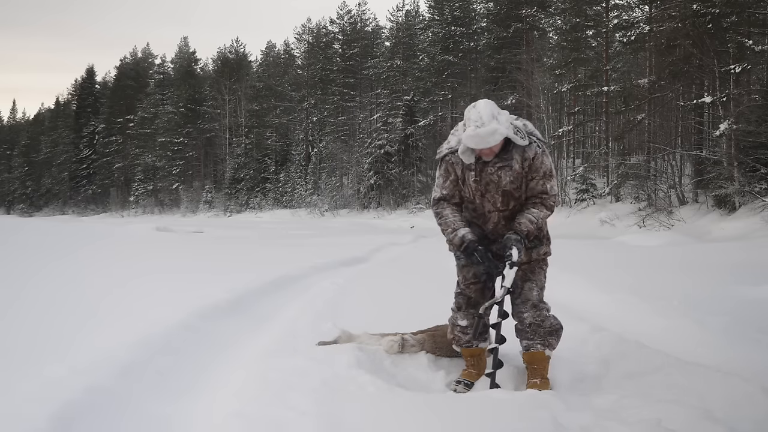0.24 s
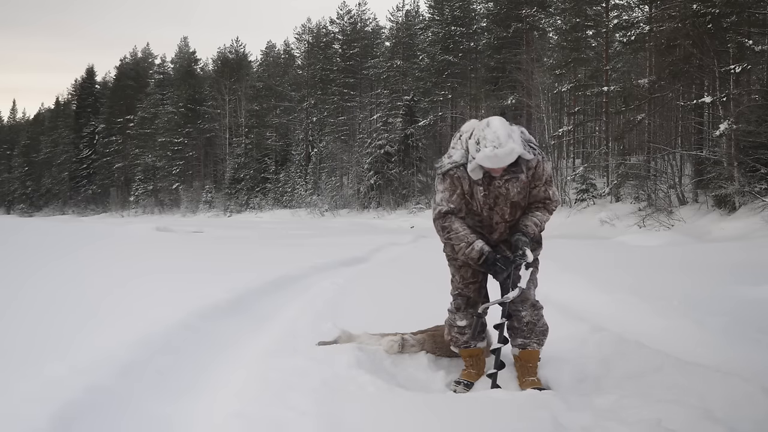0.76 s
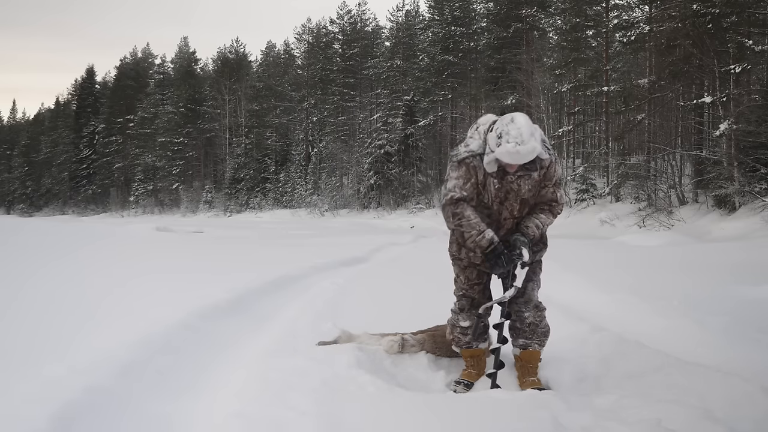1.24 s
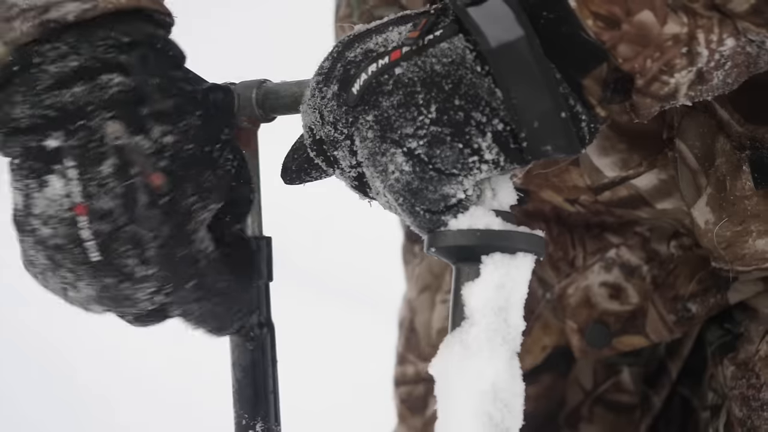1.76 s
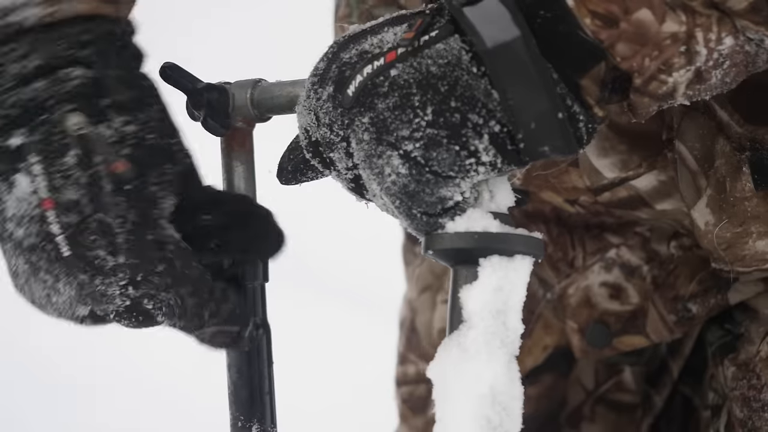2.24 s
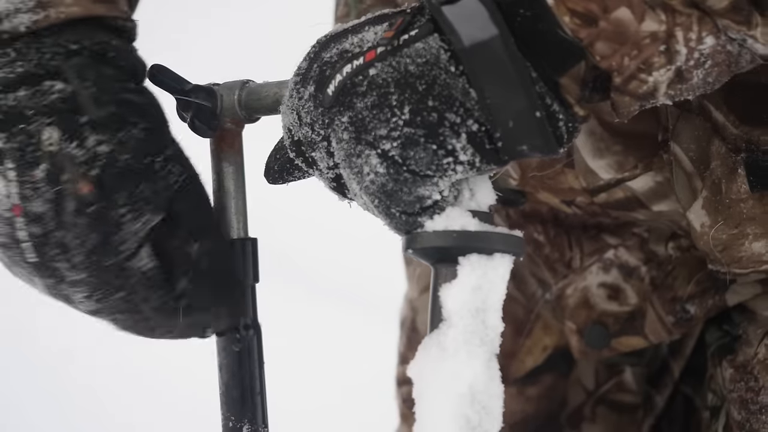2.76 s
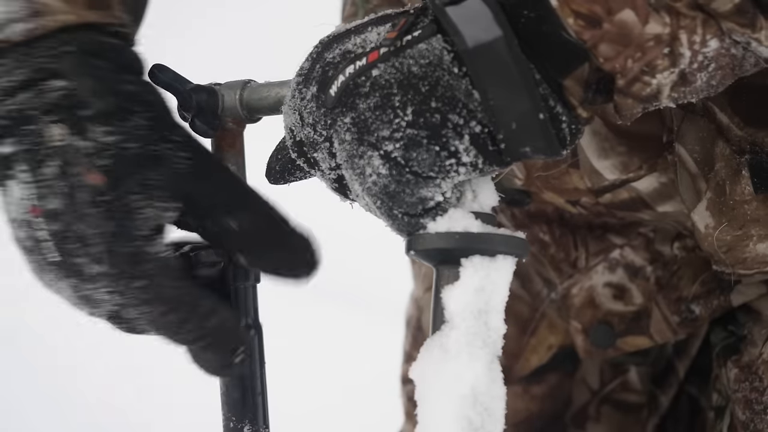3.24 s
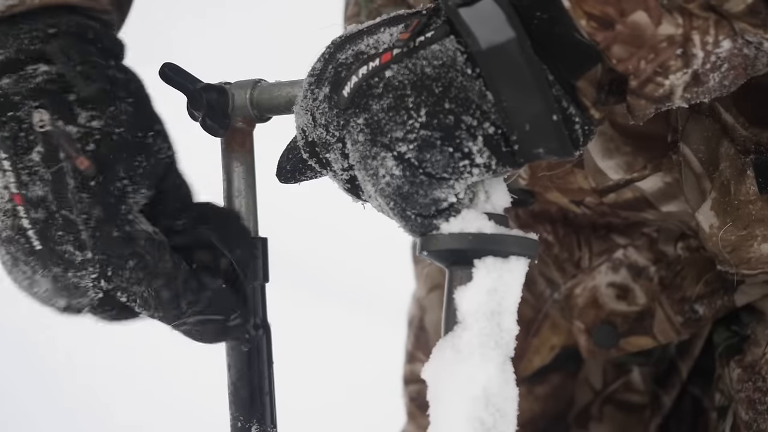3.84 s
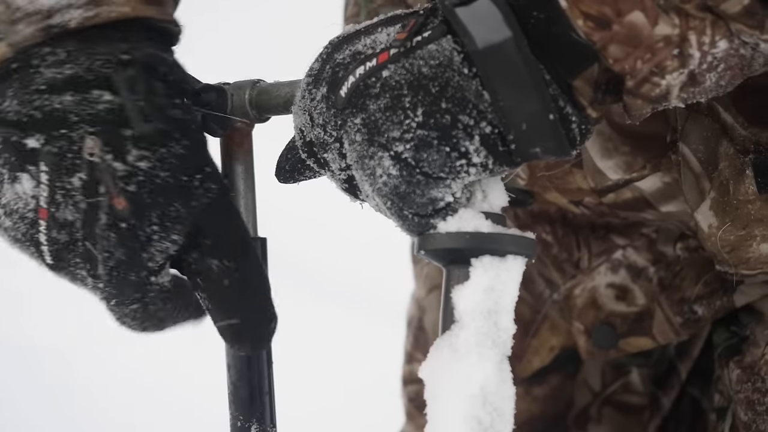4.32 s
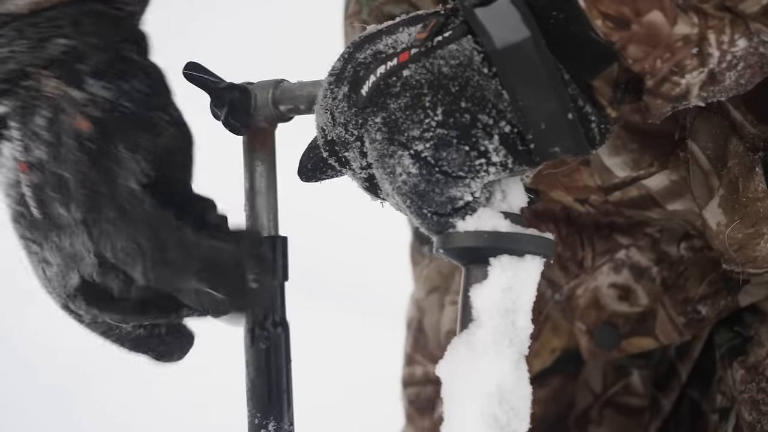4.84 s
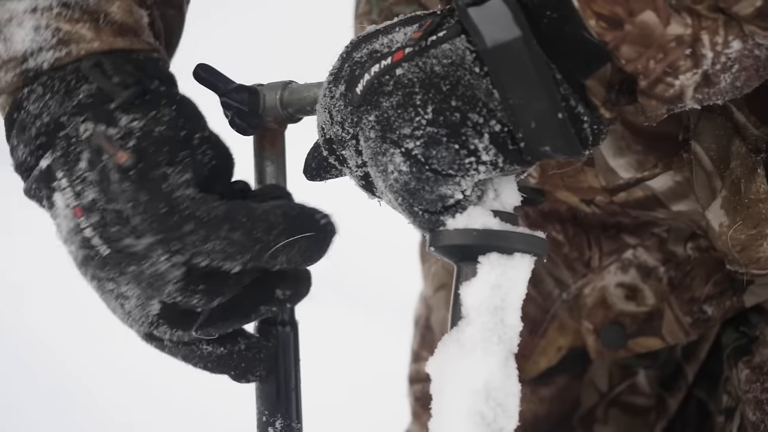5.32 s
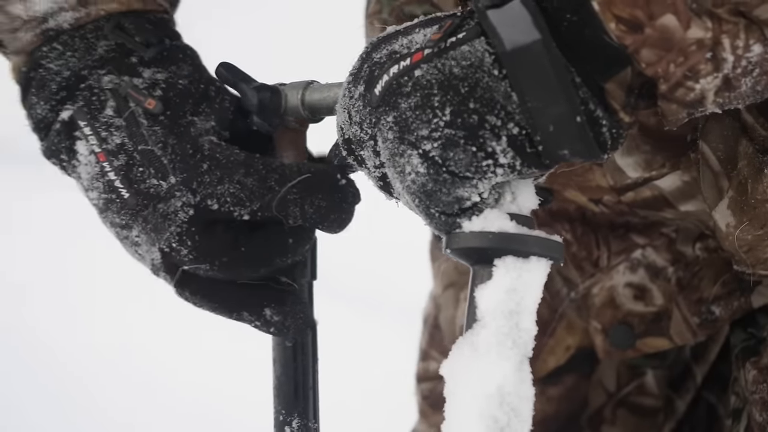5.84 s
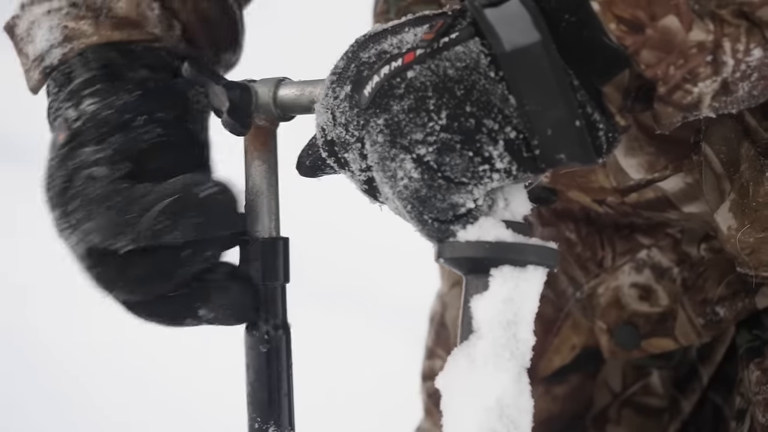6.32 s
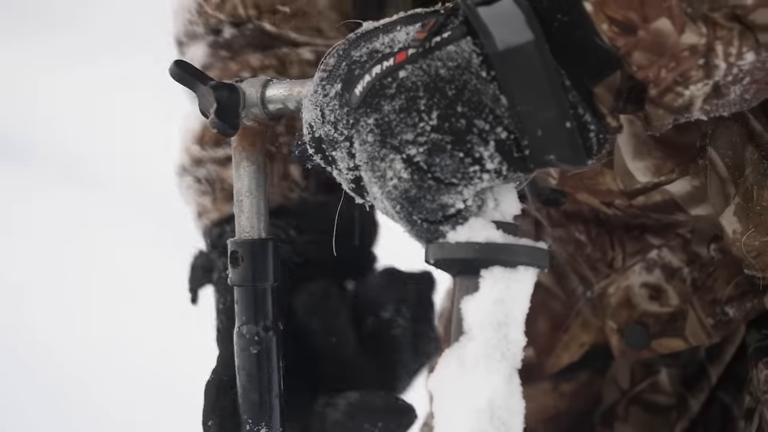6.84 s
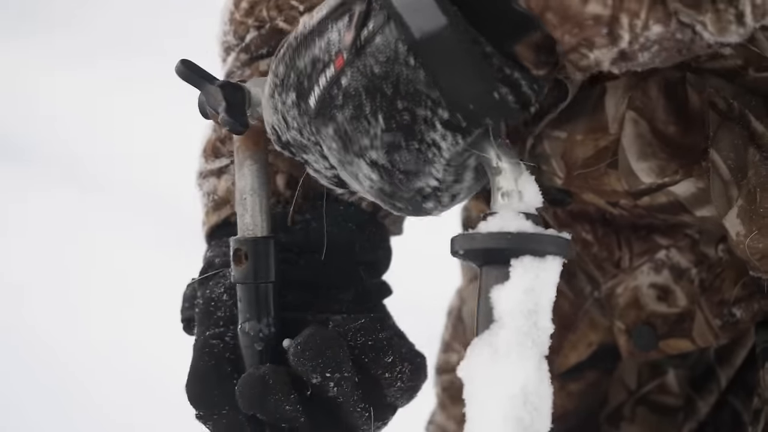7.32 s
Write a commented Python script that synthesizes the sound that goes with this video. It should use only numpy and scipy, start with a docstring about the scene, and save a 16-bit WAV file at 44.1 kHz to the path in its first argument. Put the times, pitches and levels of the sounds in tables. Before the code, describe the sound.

A hand ice auger is set up close to the microphone in open snowy air with hardly any echo. Light clicks and cloth swishes lead to a sharp plastic crack. After quick, gritty glove strokes, telescopic steel scrapes, strikes loudly and rattles, with woody knocks from the held clamp. The handling softens into rustling, while a distant soft roar and thin hiss continue throughout.

```python
"""A soft, far roar like wind in a forest, a fine hiss and the rustle of gloves and a winter jacket run throughout.
A hand ice auger is being set up on a frozen lake, close to the microphone: frosty plastic parts snap,
the telescopic steel shaft scrapes, drops into its catch and rattles, and its gripped clamp knocks.
Struck parts are sums of decaying modes with a burst of contact noise; rubbing, roar and hiss are shaped noise."""
import sys
import numpy as np
from scipy import signal
from scipy.fft import rfft, irfft
from scipy.io import wavfile
from scipy.ndimage import uniform_filter1d

SR = 44100
rng = np.random.default_rng(int(sys.argv[2]) if len(sys.argv) > 2 else 0)


def int16_out(signal):
    """Quantize to a 16-bit WAV file."""
    q = np.round(np.clip(np.atleast_2d(signal).T, -1, 1) * 32767)
    wavfile.write(sys.argv[1], SR, q.astype(np.int16))


N = 333837
TIME = np.arange(N) / SR
RING_TIME = np.arange(SR // 5) / SR  # time axis of one short sound, s


def amp(db):
    """Decibels to gain."""
    return 10 ** (np.asarray(db) / 20)


def evened(x):
    """Scales to rms 1."""
    return x / np.sqrt(np.mean(x ** 2) + 1e-20)


def as_burst(x):
    """Scales a short sound to the energy of 5 ms at rms 1."""
    return x / np.sqrt(np.sum(x ** 2) / (.005 * SR) + 1e-20)


def read(points, hz):
    """Reads a spectrum on a log-frequency axis."""
    f, value = np.transpose(points)
    return np.interp(np.log(hz + 1), np.log(f), value)


def follow(rows, t):
    """Reads every column of a curve at the times t."""
    s, *columns = np.transpose(rows)
    return [np.interp(t, s, c) for c in columns]


def coloured(x, points):
    """Multiplies x by a spectrum that dies away above its last point, at rms 1."""
    size = x.shape[-1]
    hz = np.fft.rfftfreq(size, 1 / SR)
    closing = 1 / (1 + (hz / points[-1][0]) ** 90)
    shaped = rfft(x) * amp(read(points, hz)) * closing
    return evened(irfft(shaped, size))


def edge(x, hz, kind, order):
    """A causal Butterworth low-pass or high-pass."""
    sos = signal.butter(order, min(hz, .45 * SR), kind, fs=SR, output="sos")
    return signal.sosfilt(sos, x)


def noise_pair(same):
    """White noise for two channels that share the fraction same of their power."""
    common, left, right = rng.standard_normal((3, N))
    same = np.clip(same, 0, 1)
    return np.sqrt(same) * common + np.sqrt(1 - same) * np.array([left, right])


def wander(per_s):
    """A random curve of rms 1 with per_s new values a second, joined by straight lines."""
    knots = rng.standard_normal(N // 20)
    return evened(np.interp(TIME * per_s, np.arange(len(knots)), knots))


def add(mix, s, sound):
    """Adds a sound at the time s."""
    part = mix[max(round(s * SR), 0):][:len(sound)]
    part += sound[:len(part)]


def moving_band(hz, width_below, width_above, same):
    """Noise in a bell around the moving pitch hz; the widths are in octaves."""
    f, t, z = signal.stft(noise_pair(same), SR, nperseg=2048, noverlap=1536)
    octaves = np.log2((f[:, None] + 1) / np.interp(t, TIME, hz))
    width = np.where(octaves < 0, width_below, width_above)
    bell = 1 / (1 + (octaves / width) ** 2) ** 2
    return evened(signal.istft(z * bell, SR, nperseg=2048, noverlap=1536)[1][:, :N])


# Crest of the far roar. Each row: time in seconds, pitch in Hz.
ROAR_PITCH = [(0, 315), (.8, 312), (1.9, 410), (2.7, 418), (4.4, 548), (4.9, 445), (5.5, 412), (7, 322),
              (7.57, 434)]
# Body under the crest. Each row: frequency in Hz, relative level in dB per Hz.
ROAR_BODY = [(8, -9.5), (25, 0), (55, -1), (110, -3.5), (220, -4.5), (380, -5.5), (600, -16.5),
             (900, -21.5), (1600, -22.5), (4000, -32.5), (9000, -71.5)]
CREST_DB, BODY_DB = -58, -54.5
# one low moan swells in the roar while its pitch sags
MOAN_PEAK_S, MOAN_WIDTH_S, MOAN_DB = .9, 0.51, -59
MOAN_HZ, MOAN_SAG_OCT_PER_S = 189, .25  # pitch at the peak, and its fall


def far_roar():
    """A diffuse roar in the distance: noise whose crest climbs and sinks in pitch, with a brief low moan."""
    crest = amp(CREST_DB) * moving_band(follow(ROAR_PITCH, TIME)[0], width_below=1.0, width_above=0.61, same=0.31)
    body = amp(BODY_DB) * coloured(noise_pair(same=0.29), ROAR_BODY)
    from_peak = TIME - MOAN_PEAK_S
    sagging_time = np.clip(from_peak, -MOAN_WIDTH_S, MOAN_WIDTH_S)
    moan_hz = MOAN_HZ * 2 ** (-MOAN_SAG_OCT_PER_S * sagging_time)
    swell = amp(MOAN_DB) * np.exp(-(from_peak / MOAN_WIDTH_S) ** 2)
    moan = swell * moving_band(moan_hz, width_below=0.34, width_above=0.25, same=1.0)
    return crest + body + moan


# Stereo width of the hiss. Each row: frequency in Hz, side minus mid in dB before width_db is added.
HISS_WIDTH = [(1000, -11.5), (2500, -0.5), (4400, -3), (6500, -9), (9000, -28), (11000, -3.5), (14000, 3)]


def wide_noise(points, width_db):
    """Noise of a given spectrum that is partly different in the two channels."""
    mid, side = coloured(rng.standard_normal((2, N)), points)
    side_gain = amp(width_db + read(HISS_WIDTH, np.fft.rfftfreq(N, 1 / SR)))
    side = irfft(rfft(side) * side_gain, N)
    return np.array([mid + side, mid - side])


# Opening hiss. Each row: frequency in Hz, relative level in dB per Hz.
EARLY_HISS = [(200, 4.5), (650, 7), (900, -3), (1600, -2), (3000, -3.5), (6000, -4.5), (9500, -4.5),
              (12500, -10), (16000, -17)]
# Lasting hiss. Each row: frequency in Hz, relative level in dB per Hz.
HISS = [(200, 6), (1200, -11.5), (2500, -7), (4000, -1.5), (6000, -3.5), (7500, -1), (9800, -8),
        (12500, -3), (16000, -10)]
# a stronger hiss fills the opening, then fades quickly around EARLY_END_S
EARLY_DB, EARLY_END_S, EARLY_FADE_S = -58, 1.65, 0.022


def hiss():
    """The fine hiss of the open air and the microphone, steady throughout; a stronger hiss fills the opening
    and fades quickly."""
    opening = (1 - np.tanh((TIME - EARLY_END_S) / EARLY_FADE_S)) / 2
    early = amp(EARLY_DB) * opening * wide_noise(EARLY_HISS, width_db=-2)
    lasting = amp(-67.5) * wide_noise(HISS, width_db=-10.5)
    return early + lasting


STROKE_SKEW, STROKE_ARCH = 0.93, 0.52  # how the arch of speed leans, and how round its top is


def stroke(start, length):
    """Speed of one movement, 0-1: a leaning arch."""
    u = np.clip((TIME - start) / length, 0, 1)
    moving = (u > 0) & (u < 1)
    speed = np.zeros(N)
    speed[moving] = np.sin(np.pi * u[moving] ** STROKE_SKEW) ** STROKE_ARCH
    return speed


def friction(grains_per_s, grain_db, flutter_db):
    """Fibres slip: a smooth rush with tiny separate catches, fluttering with the pressure."""
    size_db = 4 * np.minimum(rng.exponential(1, N), 2.5)
    size = amp(size_db) * rng.choice([-1, 1], N)
    grains = evened(size * (rng.random(N) < grains_per_s / SR))
    rush = rng.standard_normal(N)
    return (rush + amp(grain_db) * grains) * amp(flutter_db * wander(per_s=88))


CRUNCH_PER_S, CRUNCH_DB = 110, -5.5  # frost grains crushed under the glove


def crunch(grain_s=0.00136, spread_db=4):
    """Frost grains break one by one, each in a tiny decaying puff of noise."""
    size_db = spread_db * np.minimum(rng.exponential(1, N), 2)
    breaks = amp(size_db) * (rng.random(N) < CRUNCH_PER_S / SR)
    puffs = signal.lfilter([1], [1, -np.exp(-1 / (grain_s * SR))], breaks)
    return evened(puffs * rng.standard_normal(N))


# Modes of the steel shaft. Each row: frequency in Hz, relative level in dB, t60 in seconds at ring factor 1.
SHAFT_MODES = [(1105, -15, .06), (1305, -22, .05), (1590, -9, .06), (1927, -15, .04), (2200, -6, .08),
               (2255, -1, .09), (2365, -6, .07), (2440, -2, .075), (2490, -4, .07), (3150, -9, .08),
               (3725, -6, .06), (3818, -7, .07), (4115, -7, .065), (4595, -3, .06), (4720, -1, .06),
               (4795, -5, .05), (5095, -11, .05), (5410, -9, .05), (5780, -10, .035), (7050, -12, .04),
               (8500, -14, .035), (9180, -11, .04), (9820, -7, .04), (10870, -15, .035), (11620, -8, .035),
               (12430, -12, .04), (15550, -17, .03)]


def rubbed_shaft(slips):
    """Friction slips keep the modes of the shaft ringing."""
    hz, db, t60 = np.transpose(SHAFT_MODES)[:, :, None]
    decay = amp(db - 60 * RING_TIME / t60)
    ring = (decay * np.sin(2 * np.pi * hz * RING_TIME)).sum(0)
    return evened(signal.oaconvolve(slips, ring)[:N])


CLOTH_SLACK_S = 0.019  # loose cloth smooths the start and end of a stroke


def slackened(power):
    """Turns the power of the rubbing into a gain with soft edges."""
    smooth = uniform_filter1d(power, max(round(CLOTH_SLACK_S * SR), 1))
    return np.sqrt(abs(smooth))


# Strokes of glove and sleeve, close by. Each row: start in seconds, length in seconds,
# rustle level in dB at the top of the arch, swish over rustle in dB.
STROKES = [(0.0, 0.093, -59, 0), (0.155, 0.3, -57.5, -4.5), (0.393, 0.23, -60, 1.5),
           (0.588, 0.37, -62.5, -3), (1.18, 0.53, -66, 1), (1.522, 0.25, -62, -1), (1.747, 0.24, -61, -1),
           (2.201, 0.19, -60, 0.5), (2.38, 0.11, -54.5, -3.5), (2.528, 0.042, -56.5, -3),
           (2.563, .12, -67.5, 3), (2.78, 0.065, -62.5, 0), (2.874, 0.074, -54.5, -6),
           (2.944, 0.087, -56.5, 1), (3.053, 0.1, -62.5, -3), (3.301, 0.089, -53, -2.5),
           (3.417, .2, -57.5, -2), (3.824, 0.16, -60, -2.5), (3.987, 0.12, -62, -9),
           (4.113, 0.55, -71, 2.5), (4.653, 0.19, -55.5, -4.5), (4.825, .13, -57, -4),
           (5.365, 0.15, -60, -15), (5.516, 0.11, -53.5, -10.5), (5.752, 0.29, -59, -8),
           (6.235, 0.3, -61.5, -1), (6.59, .065, -58, -3.5), (6.721, 0.087, -56.5, -4),
           (6.888, 0.1, -56, -5.5), (6.967, 0.086, -50, -1.5), (7.04, 0.56, -53.5, -5)]
# Cloth rustle. Each row: frequency in Hz, relative level in dB per Hz.
RUSTLE = [(300, -7.5), (800, -10.5), (1250, -3.5), (1900, -1.5), (2500, -4), (3100, -6.5), (4600, -11),
          (6000, -13), (9000, -13.5)]
# Bright cloth swish. Each row: frequency in Hz, relative level in dB per Hz.
SWISH = [(3000, -35), (6200, -36.5), (7500, -7.5), (9200, 4.5), (11000, 2.5), (13000, -1.5), (16000, -15)]
REST_RUSTLE_DB, REST_SWISH_DB = -73, -67  # the jacket is never quite still


def cloth(echo_s=0.001659, echo_share=0.31, steel_db=-11):
    """Frosty gloves and jacket rustle and swish; a near reflection ripples the rustle, and the shaft rings in it."""
    rustle_power, swish_power = amp(REST_RUSTLE_DB) ** 2, amp(REST_SWISH_DB) ** 2
    for start, length, db, swish_db in STROKES:
        gain = amp(db) * stroke(start, length)
        rustle_power = rustle_power + gain ** 2
        swish_power = swish_power + (amp(swish_db) * gain) ** 2
    slips = friction(grains_per_s=700, grain_db=-3, flutter_db=1.9)
    gritty = evened(slips) + amp(CRUNCH_DB) * crunch()
    echoed = gritty + echo_share * np.interp(TIME - echo_s, TIME, gritty)
    rustle = evened(coloured(echoed, RUSTLE) + amp(steel_db) * rubbed_shaft(gritty))
    swish = coloured(slips, SWISH)
    return slackened(rustle_power) * rustle + slackened(swish_power) * swish


STRIKE_PLACE_DB = 0.5  # each blow lands elsewhere: every mode varies by up to this much either way


def struck(modes, crack, ring, crack_db, crack_s, dense_db, dense_t60):
    """One blow: main modes, the crack of the contact and a wash of many weak modes; ring stretches all three."""
    hz, db, t60 = np.transpose(modes)[:, :, None]
    t = RING_TIME / max(ring, .1)
    phase, place = rng.random((2, len(modes), 1))
    db = db + STRIKE_PLACE_DB * (2 * place - 1)
    decay = amp(db - 60 * t / t60)
    tones = (decay * np.sin(2 * np.pi * (hz * RING_TIME + phase))).sum(0)
    contact = np.exp(-(t / crack_s) ** 2)
    chatter = rfft(rng.standard_normal(len(t)) * contact)
    chatter = irfft(chatter / (abs(chatter) + 1e-9), len(t))  # a hard contact drives all frequencies alike
    snap = coloured(chatter, crack) * np.exp(-(t / (2 * crack_s)) ** 2)
    wash = coloured(rng.standard_normal(len(t)), crack) * amp(-60 * t / dense_t60)
    return as_burst(tones) + amp(crack_db) * as_burst(snap) + amp(dense_db) * as_burst(wash)


# Snaps of cold plastic and ice, close by. Each row: start in seconds, level in dB,
# low edge in Hz, high edge in Hz, ring length factor.
SNAPS = [(0.236, -40, 1100, 2840, 0.48), (.3937, -47, 1000, 12000, 0.21), (0.4532, -47.5, 3600, 4200, 1.9),
         (0.61, -50, 500, 1410, 1.4), (.694, -40.5, 6130, 13100, 1), (.7115, -50, 7500, 11000, .87),
         (0.9771, -41, 1180, 13000, 0.62), (1.5069, -24, 180, 14800, 0.58),
         (1.5082, -26.5, 1200, 13000, 1.5), (1.526, -44, 200, 3000, 2.8), (1.545, -50, 150, 4000, 2.6),
         (2.0837, -51, 8500, 15500, 0.25), (2.995, -60, 2000, 14000, .57),
         (4.422, -50.5, 3000, 13100, 0.41), (7.010, -46, 1200, 12900, .55), (7.4335, -51, 7000, 11000, .92)]
# Modes of the plastic. Each row: frequency in Hz, relative level in dB, t60 in seconds at ring factor 1.
PLASTIC_MODES = [(660, -12, .035), (1190, -13, .03), (1600, -11, .03), (2900, -14, .025), (4290, -10, .025),
                 (5750, -8, .02), (6325, -2, .028), (7050, -7, .025), (8380, 1, .028), (8880, -4, .028),
                 (9340, -4, .036), (10800, -9, .02), (12750, -6, .02)]
# First crack of a snap. Each row: frequency in Hz, relative level in dB per Hz.
PLASTIC_CRACK = [(100, -8), (500, -6), (2000, -4.5), (5000, -6), (9000, -3.5), (12500, -2), (16000, -19)]
THUD_HZ, THUD_T60_S, THUD_DB = 335, .02, -13.5  # the low push of the part that snaps


def snaps():
    """Brittle, quickly damped clicks, each in its own band; those with a deep low edge let a thud through."""
    out = np.zeros(N)
    thud_decay = np.exp(-np.log(1000) * RING_TIME / THUD_T60_S)
    thud = as_burst(np.sin(2 * np.pi * THUD_HZ * RING_TIME) * thud_decay)
    for s, db, low_hz, high_hz, ring in SNAPS:
        click = struck(PLASTIC_MODES, PLASTIC_CRACK, ring, crack_db=-1, crack_s=.003, dense_db=-15, dense_t60=.055)
        click = edge(click + amp(THUD_DB) * thud, low_hz, "high", order=2)
        click = edge(click, high_hz, "low", order=3)
        add(out, s, amp(db) * as_burst(click))
    return out


# Blows on the steel shaft, close by. Each row: start in seconds, level in dB,
# contact cut-off in Hz, ring length factor.
SHAFT_BLOWS = [(3.0567, -50.5, 3800, .4), (3.546, -52, 3000, .35), (4.8223, -38.5, 6400, 0.94),
               (4.837, -34.5, 8000, 1), (4.884, -40.5, 7500, .9), (4.9187, -47, 4440, 0.6),
               (4.9994, -14.5, 12500, 0.91), (5.0072, -30, 12000, 0.99), (5.027, -25.5, 12000, .85),
               (5.0387, -14.5, 7060, 0.79), (5.0773, -21, 11000, 0.63), (5.1497, -31.5, 3380, 1),
               (5.1555, -35, 4000, .9), (5.4254, -31.5, 5240, 0.59), (5.5343, -42.5, 2790, .65),
               (5.5892, -45, 2200, 0.49), (5.602, -51, 1980, 0.32), (5.821, -44, 2300, .45),
               (5.843, -46, 2300, .45), (6.0772, -50.5, 2860, 0.63), (6.8908, -50, 3080, 0.34),
               (7.494, -43, 2400, 0.75)]
# First crack of a blow. Each row: frequency in Hz, relative level in dB per Hz.
SHAFT_CRACK = [(200, -42), (850, -24), (1150, -7.5), (2300, -3.5), (4700, -1.5), (6300, -8), (10000, -1),
               (13000, -5), (16800, -13)]
CONTACT_RISE_S = 0.00033


def shaft():
    """Steel meets steel; a soft, gloved contact leaves the high modes almost still."""
    out = np.zeros(N)
    for s, db, cutoff_hz, ring in SHAFT_BLOWS:
        blow = struck(SHAFT_MODES, SHAFT_CRACK, ring, crack_db=-1, crack_s=0.0039, dense_db=-5.5, dense_t60=.05)
        blow = blow * (1 - np.exp(-RING_TIME / CONTACT_RISE_S))
        blow = edge(blow, 660, "high", order=2)  # a thin tube radiates little bass
        dull = edge(blow, cutoff_hz, "low", order=3) + amp(-21.5) * blow
        add(out, s, amp(db) * as_burst(dull))
    return out


# Dull knocks of the gripped clamp. Each row: start in seconds, level in dB.
CLAMP_KNOCKS = [(3.368, -50.5), (4.4513, -58), (4.824, -45), (4.838, -39.5), (4.886, -46), (5.1629, -30.5),
                (5.1658, -29.5), (5.369, -56.5), (5.4229, -32), (5.59, -44), (5.602, -50), (5.8005, -42),
                (5.82, -47), (5.8277, -43.5), (5.836, -45.5), (6.4546, -55), (6.478, -54.5), (6.604, -55),
                (6.8254, -47.5)]
# Modes of the clamp. Each row: frequency in Hz, relative level in dB, t60 in seconds at ring factor 1.
CLAMP_MODES = [(526, -14, .065), (860, -18, .04), (1133, -7, .04), (1312, -10, .035), (1596, 0, .035),
               (1841, -1, .035), (2073, -11, .03), (2394, -6, .035), (3250, -14, .025), (4130, -17, .03)]
# First crack of a knock. Each row: frequency in Hz, relative level in dB per Hz.
CLAMP_CRACK = [(200, -29), (550, -2), (1100, -4.5), (1700, 3), (2400, -26), (3500, -7.5), (6000, -16.5),
               (10000, -17), (16000, -36)]
# ring factor of a knock at -30 dB; weaker ones stay in the glove and die sooner
KNOCK_RING, KNOCK_DB_PER_DOUBLING = 1, 31


def clamp():
    """Held in the glove, the clamp gives short, woody knocks."""
    out = np.zeros(N)
    rise = 1 - np.exp(-RING_TIME / 0.00052)  # soft contact
    for s, db in CLAMP_KNOCKS:
        ring = KNOCK_RING * 2 ** ((db + 30) / KNOCK_DB_PER_DOUBLING)
        knock = struck(CLAMP_MODES, CLAMP_CRACK, ring, crack_db=-11.5, crack_s=0.0014, dense_db=-7.0, dense_t60=0.041)
        add(out, s, amp(db) * as_burst(knock * rise))
    return out


# Faint squeaks of a glove on the shaft. Each row: start in seconds, length in seconds, level in dB.
SQUEAKS = [(4.387, .07, -66), (7.197, .16, -62)]
SQUEAK_HZ = 2450


def squeak():
    """A thin, fuzzy note of glove on steel: a narrow band of noise."""
    level = sum(amp(db) * stroke(start, length) for start, length, db in SQUEAKS)
    return level * moving_band(np.full(N, SQUEAK_HZ), width_below=.07, width_above=0.11, same=0.95)


# High metallic pings of the clamp's loose part and, near 9800 Hz, of the shaft.
# Each row: start in seconds, level in dB, pitch in Hz, t60 in seconds.
PINGS = [(4.836, -39.5, 9800, .032), (4.837, -53, 7050, .07), (4.8838, -51, 7080, .11),
         (4.919, -58, 7170, .07), (5.0, -26, 7030, 0.047), (5.5923, -44.5, 6800, 0.05),
         (5.8204, -42.5, 6850, 0.026), (5.836, -54, 6870, .04)]


def pings():
    """Each ping is one decaying high note."""
    out = np.zeros(N)
    for s, db, hz, t60 in PINGS:
        note = np.sin(2 * np.pi * hz * RING_TIME) * amp(-60 * RING_TIME / t60)
        add(out, s, amp(db) * as_burst(note))
    return out


# just before it catches, the inner tube scrapes along the outer one
SLIDE_START_S, SLIDE_LENGTH_S, SLIDE_DB = 5.015, 0.02, -30


def slide(ring_db=-3):
    """Steel scrapes on steel: a dense chatter of tiny contacts that keeps the shaft ringing."""
    chatter = rng.standard_normal(N)
    scrape = evened(coloured(chatter, SHAFT_CRACK) + amp(ring_db) * rubbed_shaft(chatter))
    return amp(SLIDE_DB) * stroke(SLIDE_START_S, SLIDE_LENGTH_S) * scrape


def two_ports(x, side_db=-19, near_s=0.00092, far_s=.0023):
    """Short reflections reach the two microphone ports unequally and widen the sound a little."""
    near = np.interp(TIME - near_s, TIME, x)
    far = np.interp(TIME - far_s, TIME, x)
    side = amp(side_db) * (near - far) / np.sqrt(2)
    return np.array([x + side, x - side])


def scene():
    """The auger stands straight ahead and close; snow swallows the longer echoes."""
    handling = cloth() + snaps() + shaft() + clamp() + pings() + slide()
    return far_roar() + hiss() + two_ports(handling) + squeak()


EDGE_HZ = 16450


def record(dry):
    """The recorder's band limit: a linear-phase low-pass."""
    low_pass = signal.firwin(301, EDGE_HZ, window=("kaiser", 8), fs=SR)
    return signal.oaconvolve(dry, low_pass[None], "same", axes=1)


dry = scene()
out = record(dry)
int16_out(out)
```